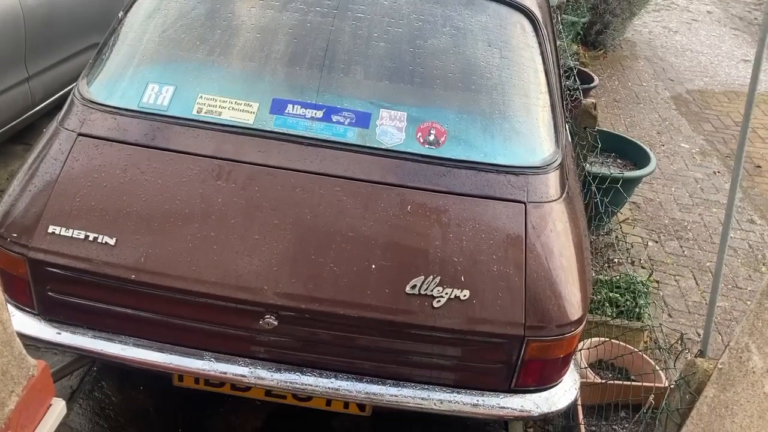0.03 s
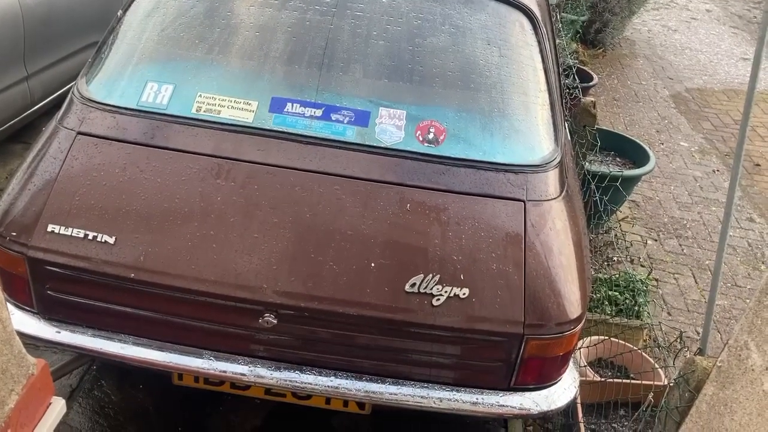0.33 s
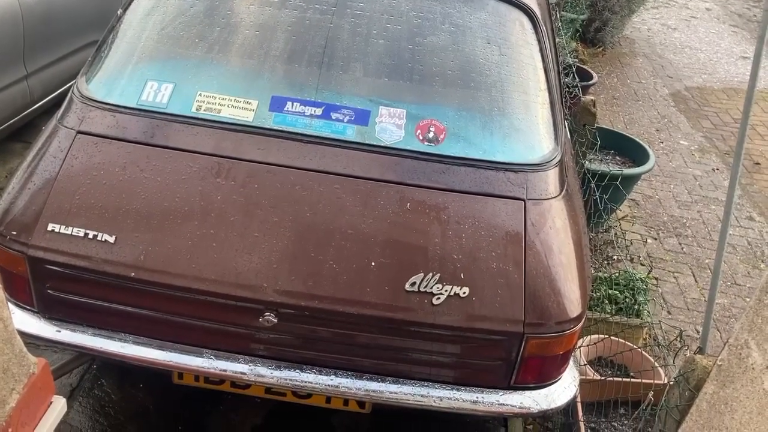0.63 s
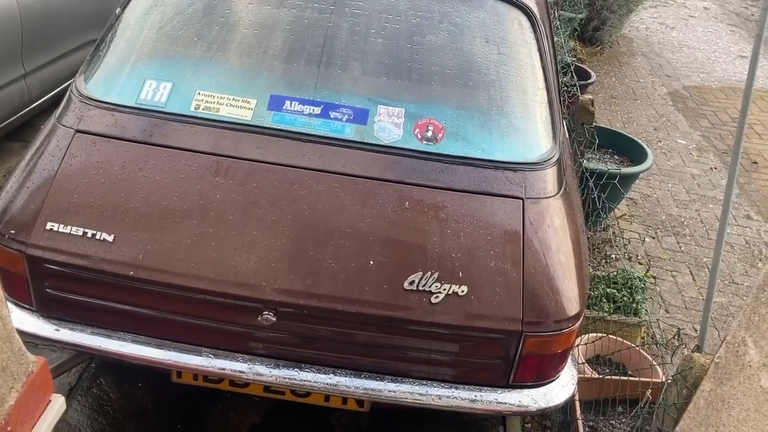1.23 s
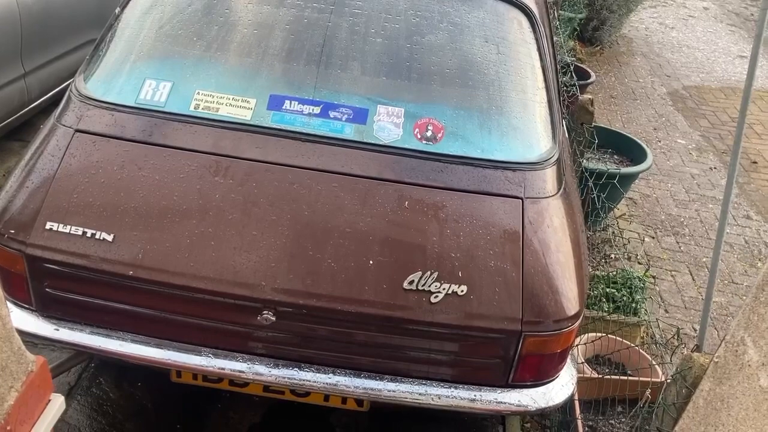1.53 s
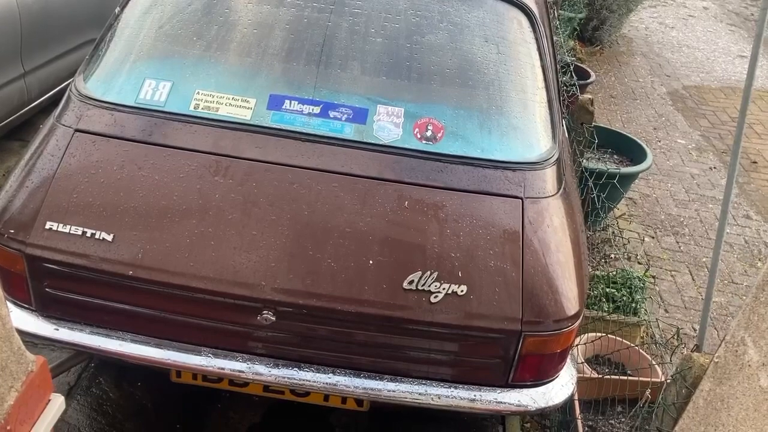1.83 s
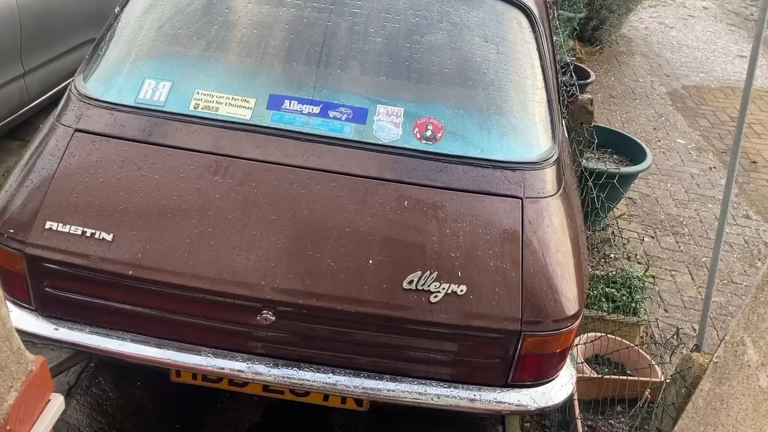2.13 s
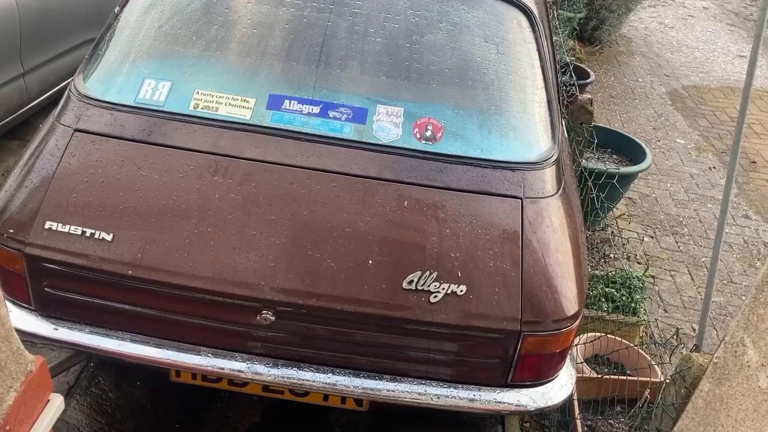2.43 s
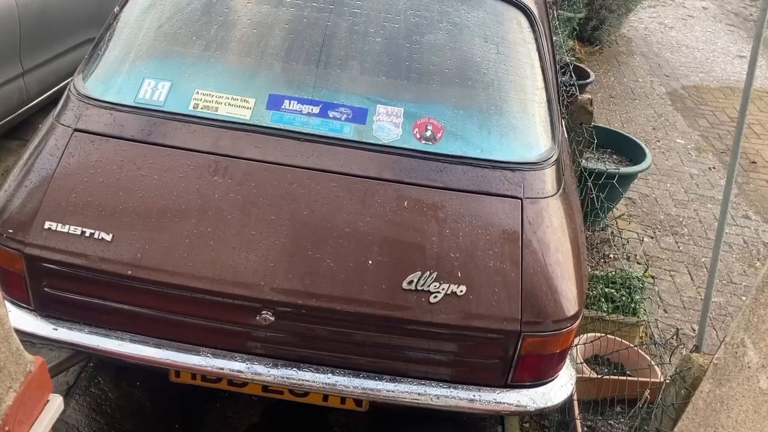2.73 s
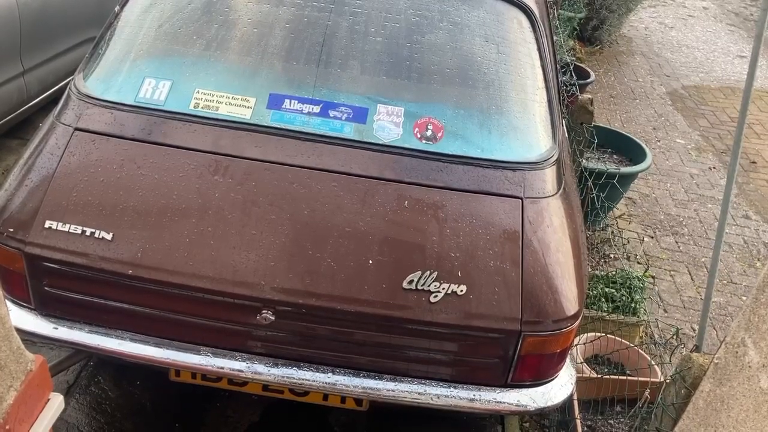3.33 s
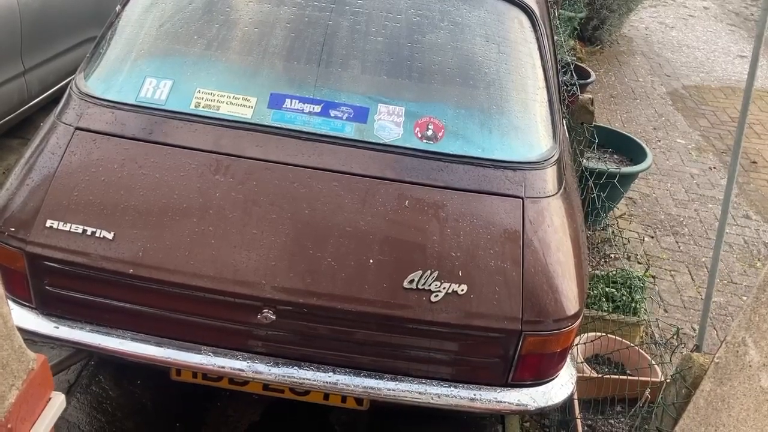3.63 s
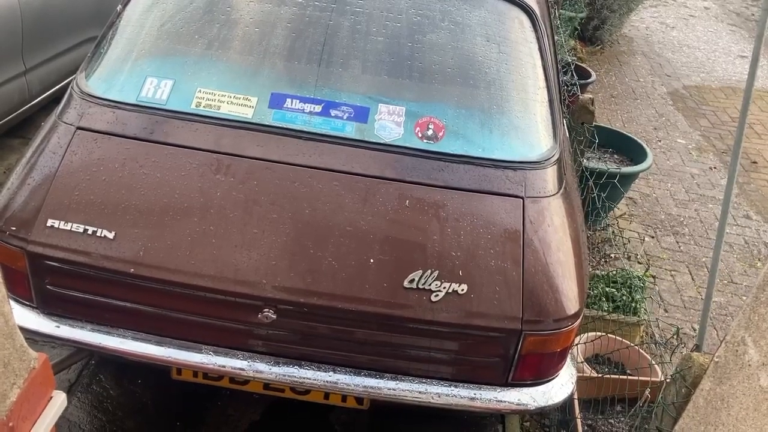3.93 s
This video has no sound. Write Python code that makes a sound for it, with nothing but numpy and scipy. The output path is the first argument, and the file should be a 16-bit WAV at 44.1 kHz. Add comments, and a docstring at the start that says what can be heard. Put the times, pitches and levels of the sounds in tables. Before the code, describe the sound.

An old car's starter grinds and rattles for about 0.3 seconds, then clunks free and whines down, stopping near 2.2 seconds. Another clunk and faint chirps come around 0.7 to 0.8 seconds, over a low hum of distant traffic. At 3 seconds the starter clunks in and cranks again. From about 3.7 seconds the engine catches with loud, rough, spitting exhaust puffs and light metal clinks, echoing briefly off walls.

```python
"""A driveway, behind the boot of an old four-cylinder car being started.
The starter grinds, gear teeth growling and rattling, slowing against each compression. It lets go
with a clunk and spins down over a low outdoor hum and faint chirps. It clunks in for a second try
and the engine catches: rough, spitting puffs boom in the tailpipe and loose metal clinks.
House wall and paving return a short echo."""
import sys
import numpy as np
from scipy import signal
from scipy.fft import rfft, irfft, next_fast_len
from scipy.io import wavfile
from scipy.ndimage import uniform_filter1d, map_coordinates

SR = 44100
rng = np.random.default_rng(int(sys.argv[2]) if len(sys.argv) > 2 else 0)


def wav_record(signal):
    """Record a signal, one row per channel, as 16-bit PCM in the file named by sys.argv[1]."""
    frames = np.transpose(np.atleast_2d(signal))
    bounded = np.clip(frames, -1, 1)
    # unit amplitude maps onto the largest positive 16-bit level
    quanta = np.round(bounded * 32767).astype(np.int16)
    wavfile.write(sys.argv[1], SR, quanta)


N = 176400

# cranking, two tries: t/s, tooth rate/Hz, growl/dB, rattle/dB, scrape/dB
FIRST_CRANK = [(0, 182.4, -39, -41, -59), (.035, 249.4, -29, -35, -51), (.085, 338.7, -35, -36.5, -46.5),
               (.135, 266.4, -31, -36.5, -52.5), (.175, 186.5, -36.5, -45, -68),
               (.22, 151.5, -32, -50, -58), (.285, 148.6, -39.5, -54, -59), (.32, 141.3, -38, -69, -73),
               (.37, 122.6, -58, -90, -90)]
SECOND_CRANK = [(3.05, 115.4, -50, -36.5, -45.5), (3.095, 152, -31, -34.5, -46),
                (3.15, 208.8, -37, -41.5, -64), (3.2, 244, -29, -34.5, -52.5), (3.24, 334.7, -35, -36, -52),
                (3.275, 316.9, -38.5, -35, -44), (3.305, 266.4, -29.5, -33.5, -52),
                (3.345, 200.3, -34.5, -38, -51.5), (3.375, 137, -32, -44, -65),
                (3.425, 132.8, -31.5, -40.5, -60.5), (3.465, 146.4, -33, -36, -47.5),
                (3.505, 374, -31.5, -33.5, -47), (3.555, 270, -32.5, -35, -51.5),
                (3.59, 164.5, -36.5, -43, -71), (3.625, 151, -31, -47.5, -61),
                (3.665, 155.4, -35, -40.5, -55), (3.72, 144.8, -34.5, -41, -50), (3.77, 176, -73, -63, -72)]
# mesh harmonics: multiple of tooth rate, level/dB
TOOTH_ORDERS = [(.5, -15.5), (1, -.5), (1.5, -14), (2, -3), (3, -10), (4, -4)]
# car body response: f/Hz, gain/dB
BODY_RESPONSE = [(90, -9), (125, -7.5), (154, -1.5), (180, -8), (211, 1.5), (238, -7), (270, 6),
                 (290, -2.5), (312, 2), (365, 1.5), (392, -3), (430, 1.5), (560, -19), (720, -19),
                 (835, -11), (1200, -50)]
# near-wall echoes: delay/s, gain/dB
WALL_ECHOES = [(.013, -13.5), (.029, -12.5), (.047, -12)]
# gear housing and flywheel scrape spectra: f/Hz, relative level/dB
HOUSING_SPECTRUM = [(150, 7.5), (450, 10), (700, 2.5), (1000, 2), (1150, 0), (1430, -1), (1800, 1),
                    (2200, -1), (3000, -17.5), (5000, -27), (7200, -43), (11500, -50)]
SCRAPE_SPECTRUM = [(1500, -9), (2900, -2), (3500, 10), (4200, 3), (5000, 11.5), (5700, 3), (7000, 5.5),
                   (8200, -3.5), (9600, -5), (11000, -3)]
# housing modes: f/Hz, relative level/dB, T60/s
RING_MODES = [(825, -6, 0.49), (973, -5.5, 0.14), (1215, -3.5, 0.18), (1300, -3.5, 0.25), (1385, -2, 0.21),
              (1504, -0.5, 0.13), (2058, -8, 0.088), (2196, -5, 0.083), (2276, -4.5, 0.094),
              (2580, 3, 0.018)]
# wandering centre of the gear rasp: t/s, f/Hz
RASP_CENTRE = [(.02, 1510), (.07, 1390), (.12, 1500), (3.14, 1340), (3.2, 1450), (3.28, 1298), (3.37, 1506),
               (3.49, 1540), (3.56, 1437), (3.72, 1380)]
TOOTH_SCATTER_DB, GROWL_NOISE_DB, RING_DB, RASP_DB = 2.5, -11, 0.5, -1.5

# distant traffic spectrum: f/Hz, relative level/dB
TRAFFIC_SPECTRUM = [(25, -12), (54, -13.5), (90, -3), (120, -12.5), (155, -12), (180, -18.5), (250, -10),
                    (351, -21.5), (410, -19.5), (680, -28.5), (830, -17), (1000, -15), (1500, -21.5),
                    (3030, -34), (5000, -55.5), (7000, -78), (11500, -62.5)]
# outdoor hum: f/Hz, width/Hz, level/dB
HUM_BANDS = [(43.9, 13, -63), (91.9, 16, -57.5), (214.4, 17, -55), (291, 30, -56.5)]
# chirps: t/s, length/s, start f/Hz, end f/Hz, level/dB
CHIRP_GLIDES = [(0.654, 0.09, 3640, 4070, -50), (0.747, 0.04, 2880, 2760, -49.5),
                (1.998, 0.044, 4230, 4100, -65.5)]
TRAFFIC_DB = -47

# pinion clunks, levels relative to CLUNK_DB: t/s, thud/dB, clank/dB, fizz/dB, T60/s
PINION_CLUNKS = [(0.258, -39, -34, -44.5, 0.094), (0.268, -36, -35, -75, 0.098),
                 (0.819, -35, -44, -51, 0.13), (0.847, -32.5, -60, -66, 0.074),
                 (2.184, -33.5, -39, -74, 0.011), (3.043, -45, -40, -44.5, 0.19),
                 (3.071, -25.5, -52, -42.5, 0.12), (3.083, -29.5, -25, -36.5, 0.052),
                 (3.649, -31.5, -33, -47, 0.19), (3.705, -28, -33.5, -52, .13)]
# clunk spectra: f/Hz, relative level/dB
THUD_SPECTRUM = [(50, -52), (160, 0), (310, 8), (540, -1.5), (740, -7), (2000, -29), (5000, -72)]
CLANK_SPECTRUM = [(200, 3), (700, -8), (980, 3), (1120, -1.5), (1400, 6), (1850, -8), (2080, 3),
                  (2700, -12), (5000, -19.5), (8000, -52)]
FIZZ_SPECTRUM = [(1000, -34), (3000, 4.5), (4200, -6), (5500, -2), (7000, -2), (9500, -2.5), (11000, -4.5)]
CLUNK_DB, CLUNK_ATTACK_PER_T60 = 3.5, 0.055

# free-spinning starter: t/s, shaft rate/Hz, whine ahead of the body response/dB
FREE_SPIN = [(.28, 66, -56), (.4, 75, -41), (.55, 90, -43.5), (.68, 99, -47), (.82, 105.2, -39.5),
             (.95, 98, -52.5), (1.1, 91, -53), (1.32, 76.96, -41), (1.5, 66.6, -54), (2.1, 42, -59)]
# whine harmonics: multiple of shaft rate, level/dB
SHAFT_ORDERS = [(3, 0), (4, -7), (5, -6), (8, -13), (11, -13)]
# starter rumble, brush and bearing rustle, brush hiss: f/Hz, relative level/dB
RUMBLE_SPECTRUM = [(30, -8), (46, 2.5), (62, -3.5), (92, 9), (120, -13.5), (160, -2), (215, -2.5), (310, 4),
                   (380, -6.5), (440, 0.5), (520, -16), (700, -13.5), (2000, -120)]
RUSTLE_SPECTRUM = [(200, -16), (450, -15), (600, -7), (720, -39), (825, 5), (870, -6.5), (960, 0.5),
                   (1450, -6.5), (2200, -9.5), (3500, -26), (5500, -32.5), (11500, -91)]
HISS_SPECTRUM = [(1500, -6), (2200, -4), (3500, -2), (5600, -12), (7000, -4), (8200, -9.5), (9200, -20.5),
                 (11000, -11.5)]
RUMBLE_DB, RUMBLE_FADE_DB_PER_S = -39.5, 4
RUSTLE_DB, RUSTLE_FADE_DB_PER_S = -42.5, 5
HISS_DB, HISS_FADE_DB_PER_S = -53, 13
STOP_S, STOP_T60_S = 2.17, 0.092

# first firings: t/s, boom/dB, blast/dB, spit/dB
ENGINE_FIRINGS = [(3.748, -27, -31.5, -49), (3.788, -25.5, -31.5, -32), (3.847, -18, -27, -33.5),
                  (3.893, -22, -20.5, -33), (3.931, -17.5, -28.5, -35), (3.966, -17.5, -21.5, -35),
                  (3.99, -28, -34, -44)]
# tailpipe modes: f/Hz, relative level/dB, T60/s
PIPE_MODES = [(42.86, 3.5, 0.3), (57, 0.5, 0.15), (72.8, 2, 0.14), (104, -6, 0.068), (204.4, -1.5, 0.099),
              (244, -10, 0.074)]
# exhaust gas spectra: f/Hz, relative level/dB
BLAST_SPECTRUM = [(30, -2), (80, -3), (200, -3), (300, -5), (400, -11), (650, -25.5), (1400, -27.5),
                  (3000, -44), (8000, -45)]
SPIT_SPECTRUM = [(300, 3.5), (700, -2.5), (950, -0.5), (1400, -8), (2500, -5.5), (3200, -8), (4200, -8),
                 (5200, -12), (7000, -7.5), (9000, -17.5), (11000, -10)]
BOOM_ATTACK_S, PUFF_ATTACK_S, BLAST_T60_S, SPIT_T60_S = 0.007, 0.0039, 0.19, 0.15
# loose metal: t/s, f/Hz, level/dB
METAL_CLINKS = [(3.793, 3280, -44), (3.861, 2094, -39.5), (3.895, 4600, -52), (3.931, 4320, -48),
                (3.967, 3150, -36), (3.98, 3980, -42)]

# stereo image: f/Hz, left-right correlation (clipped to +-1 in use)
CORRELATION = [(100, 1.06), (270, 1.2), (430, 0.87), (600, 0.44), (950, -0.38), (1400, 0.15), (2600, -0.43),
               (4000, 0.28), (5200, -0.77), (7000, 1), (9000, -0.34)]
# microphone balance: f/Hz, left over right/dB
MIC_BALANCE = [(130, 0), (300, -1.2), (520, .5), (720, -.7), (950, 3), (1300, 4.5), (1800, 2), (2800, .7),
               (6000, 0), (11000, .5)]
YARD_DB, YARD_T60_S = -2, 0.17
LOW_CUT_HZ, HIGH_CUT_HZ = 30, 11680


def amp(db):
    """Decibels to gain."""
    return 10 ** (np.asarray(db) / 20)


def unit(x):
    """Scale to rms 1."""
    return x / np.sqrt(np.mean(x ** 2) + 1e-20)


def along(points, hz):
    """Interpolate (f/Hz, value) points on a log axis."""
    f, values = np.transpose(points)
    return np.interp(np.log(hz + 1), np.log(f + 1), values)


def clock():
    """Sample times in s."""
    return np.arange(N) / SR


def curves(rows):
    """Per sample: a gate open until the last row, then each column after time."""
    times_s, *columns = np.transpose(rows)
    t = clock()
    return [t <= times_s[-1]] + [np.interp(t, times_s, column) for column in columns]


def wobble(rate_hz):
    """Smooth random curve, rate_hz knots a second."""
    return map_coordinates(rng.standard_normal(4000), [clock() * rate_hz], mode="wrap")


def filtered(x, response):
    """Apply a frequency response."""
    size = next_fast_len(N + SR // 2)
    return irfft(rfft(x, size) * response(np.fft.rfftfreq(size, 1 / SR)), size)[..., :N]


def spread(pair):
    """Two unrelated signals to stereo: bass central, treble diffuse."""
    def mid_side_gains(hz):
        angle = np.arccos(np.clip(along(CORRELATION, hz), -1, 1)) / 2
        return np.array([np.cos(angle), np.sin(angle)])
    mid, side = filtered(pair, mid_side_gains)
    return np.array([mid + side, mid - side]) / np.std(mid)


def noise(spectrum, drive=1):
    """Coloured stereo noise, modulated by drive; mid rms 1."""
    white = rng.standard_normal((2, N))
    return spread(filtered(drive * white, lambda hz: amp(along(spectrum, hz))))


def band(hz, width_hz):
    """Narrow noise round a steady or moving centre, rms 1."""
    phase = 2 * np.pi * np.cumsum(hz * np.ones(N)) / SR
    return unit(wobble(width_hz) * np.sin(phase) + wobble(width_hz) * np.cos(phase))


def mottle(pair, depth_db):
    """Shift the colour at random from moment to moment; rms 1."""
    frames = signal.stft(pair, nperseg=1024)[2]
    field = uniform_filter1d(rng.standard_normal(frames.shape[1:]), size=4, axis=0)
    field = uniform_filter1d(field, size=6, axis=1)
    return unit(signal.istft(frames * amp(depth_db * unit(field)), nperseg=1024)[1][:, :N])


def grit(depth_db=4, rate_hz=700):
    """Fast, uneven gain that breaks noise into grains."""
    return amp(depth_db * wobble(rate_hz))


def burst(start_s, attack_s, t60_s):
    """Quick rise, exponential fall."""
    age_s = np.maximum(clock() - start_s, 0)
    return (1 - np.exp(-age_s / attack_s)) * amp(-60 * age_s / t60_s)


def whine(hz, orders, rough, jitter):
    """Harmonics of a turning part, coloured by the car body."""
    phase = 2 * np.pi * np.cumsum(hz * (1 + jitter * wobble(70))) / SR
    out = 0
    for order, db in orders:
        gain = np.sqrt(2) * amp(db + along(BODY_RESPONSE, order * hz)) * (1 + rough * wobble(90))
        out += gain * np.sin(order * phase + rng.uniform(0, 2 * np.pi))
    return out


def walls(x):
    """Echoes beat against a gliding tone and make it churn."""
    def comb(hz):
        return 1 + sum(amp(db) * np.exp(-2j * np.pi * hz * delay_s) for delay_s, db in WALL_ECHOES)
    return unit(filtered(x, comb)) * np.std(x)


def gear_rattle(knocks):
    """Tooth knocks shake and ring the housing under a wandering rasp; rms 1."""
    t = np.arange(SR // 3) / SR
    modes = sum(amp(db - 60 * t / t60_s) * np.sin(2 * np.pi * hz * t) for hz, db, t60_s in RING_MODES)
    force = knocks * rng.standard_normal((2, N))
    ring = spread(signal.fftconvolve(force, modes[None], axes=1)[:, :N])
    centre_hz = curves(RASP_CENTRE)[1]
    rasp = spread(np.array([band(centre_hz, width_hz=190) for _ in range(2)]))
    shake = mottle(noise(HOUSING_SPECTRUM, knocks * grit()), depth_db=2.5)
    return unit(shake + amp(RING_DB) * ring + amp(RASP_DB) * rasp)


def cranking(rows):
    """Pinion teeth growl through the body, rattle the housing and scrape the flywheel."""
    on, tooth_hz, growl_db, rattle_db, scrape_db = curves(rows)
    fade_in = np.clip((clock() - rows[0][0]) / 0.011 + 1, 0, 1)
    teeth = np.cumsum(tooth_hz) / SR
    tooth_db = TOOTH_SCATTER_DB * rng.uniform(-0.78, 1, 4000)
    knocks = amp(tooth_db[teeth.astype(int)]) * np.exp(-(teeth % 1) / 0.5)  # one pulse per tooth
    rattle = gear_rattle(knocks)
    scrape = mottle(noise(SCRAPE_SPECTRUM, knocks * grit()), depth_db=3)
    growl = walls(whine(tooth_hz, TOOTH_ORDERS, rough=0.27, jitter=0.012))
    growl = growl + amp(GROWL_NOISE_DB) * noise(BODY_RESPONSE, knocks)
    return on * fade_in * (amp(growl_db) * growl + amp(rattle_db) * rattle + amp(scrape_db) * scrape)


def outdoors():
    """Distant traffic and a wavering low hum."""
    traffic = amp(TRAFFIC_DB + 0.9 * wobble(6.7)) * mottle(noise(TRAFFIC_SPECTRUM), depth_db=1.5)
    hum = sum(amp(db) * band(hz, width_hz) for hz, width_hz, db in HUM_BANDS)
    return traffic + hum


def clunks():
    """The pinion strikes and leaves the flywheel: thud, clank, bright fizz."""
    thud, clank = noise(THUD_SPECTRUM), noise(CLANK_SPECTRUM)
    fizz = noise(FIZZ_SPECTRUM, grit(depth_db=1.2, rate_hz=500))
    out = np.zeros((2, N))
    for start_s, thud_db, clank_db, fizz_db, t60_s in PINION_CLUNKS:
        strike = amp(thud_db) * thud + amp(clank_db) * clank + amp(fizz_db) * fizz
        out += burst(start_s, CLUNK_ATTACK_PER_T60 * t60_s, t60_s) * strike
    return amp(CLUNK_DB) * out


def spin_down():
    """The starter's whine, rumble and rustle run from the start, under the cranking; once freed it speeds up,
    then coasts to rest. Hiss enters at the release and fades fastest, rumble slowest."""
    on, shaft_hz, whine_db = curves(FREE_SPIN)
    t = clock()
    rumble = amp(RUMBLE_DB - RUMBLE_FADE_DB_PER_S * t) * mottle(noise(RUMBLE_SPECTRUM), depth_db=2)
    rustle_db = RUSTLE_DB - RUSTLE_FADE_DB_PER_S * t + 2.2 * wobble(25.25)
    rustle = amp(rustle_db) * mottle(noise(RUSTLE_SPECTRUM), depth_db=4)
    hiss_db = HISS_DB - HISS_FADE_DB_PER_S * t + 1.8 * wobble(15.54)
    hiss = amp(hiss_db) * mottle(noise(HISS_SPECTRUM), depth_db=2.5)
    tone = amp(whine_db) * whine(shaft_hz, SHAFT_ORDERS, rough=0.074, jitter=0.005)
    freed = t > FREE_SPIN[0][0]
    stop = amp(-60 * np.maximum(t - STOP_S, 0) / STOP_T60_S)
    return on * tone + stop * (rumble + rustle) + freed * hiss


def chirps():
    """Faint, fluttering chirps that glide and level off."""
    out = np.zeros(N)
    for start_s, length_s, start_hz, end_hz, db in CHIRP_GLIDES:
        progress = np.clip((clock() - start_s) / length_s, 0, 1)
        glide_hz = end_hz + (start_hz - end_hz) * (1 - progress) ** 2
        pitch_hz = glide_hz * (1 + 0.042 * wobble(700))
        out += amp(db) * np.sin(np.pi * progress) * np.sin(2 * np.pi * np.cumsum(pitch_hz) / SR)
    return out


def exhaust():
    """Each firing booms in the tailpipe with a rough blast and a spit of gas."""
    blast = noise(BLAST_SPECTRUM)
    spit = mottle(noise(SPIT_SPECTRUM, grit()), depth_db=2.5)
    out = np.zeros((2, N))
    for start_s, boom_db, blast_db, spit_db in ENGINE_FIRINGS:
        for hz, db, t60_s in PIPE_MODES:
            mode = np.sin(2 * np.pi * hz * (clock() - start_s))
            out += amp(boom_db + db) * mode * burst(start_s, BOOM_ATTACK_S, t60_s)
        out += amp(blast_db) * blast * burst(start_s, PUFF_ATTACK_S, BLAST_T60_S)
        out += amp(spit_db) * spit * burst(start_s, PUFF_ATTACK_S, SPIT_T60_S)
    return out


def clatter():
    """Loose metal clinks as the first firings shake the car."""
    pair = np.zeros((2, N))
    for start_s, hz, db in METAL_CLINKS:
        ring = np.array([band(hz, width_hz=350) for _ in range(2)])
        pair += amp(db) * burst(start_s, attack_s=0.0015, t60_s=0.036) * ring
    return spread(pair) * np.std(pair)


def yard(x):
    """Short, bass-light echo off the house wall and paving."""
    t = np.arange(SR // 2) / SR
    decay = amp(-60 * t / YARD_T60_S) * (t > 0.006)
    tail = spread(rng.standard_normal((2, N)))[:, :len(t)] * decay
    wet = signal.fftconvolve(x, tail / np.linalg.norm(tail[0]), axes=1)[:, :N]
    return filtered(wet, lambda hz: hz / (hz + 500))


def scene():
    """Car, echo, background."""
    starter = cranking(FIRST_CRANK) + cranking(SECOND_CRANK) + clunks() + spin_down()
    car = starter + exhaust() + clatter()
    return car + amp(YARD_DB) * yard(car) + outdoors() + chirps()


def record(dry):
    """Two slightly unequal, band-limited microphones."""
    def response(hz):
        balance = amp(along(MIC_BALANCE, hz) * np.array([[0.5], [-0.5]]))
        low_cut = hz ** 6 / (hz ** 6 + LOW_CUT_HZ ** 6)
        high_cut = 1 / (1 + (hz / HIGH_CUT_HZ) ** 300)
        return balance * low_cut * high_cut
    return filtered(dry, response)


dry = scene()
out = record(dry)
wav_record(out)
```